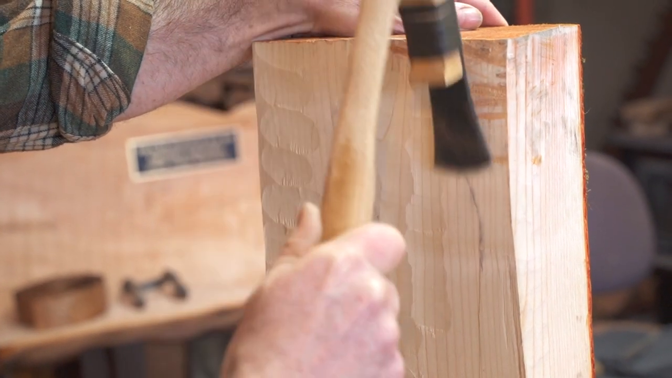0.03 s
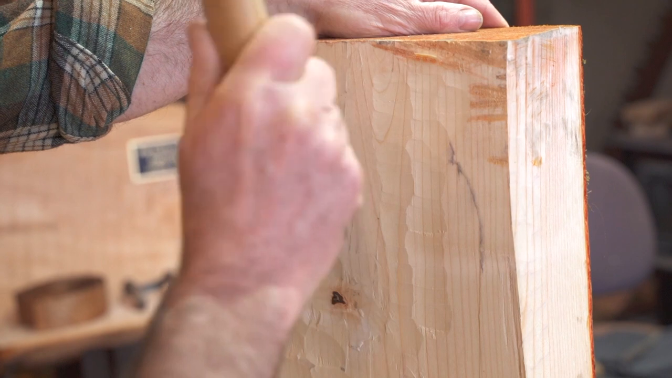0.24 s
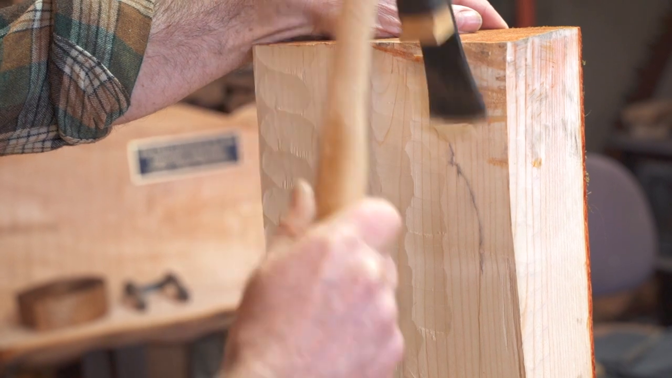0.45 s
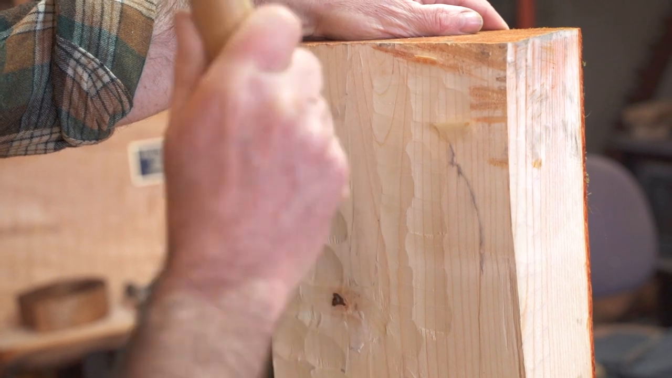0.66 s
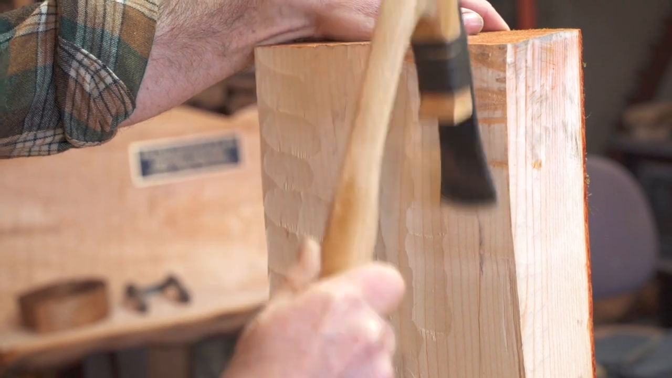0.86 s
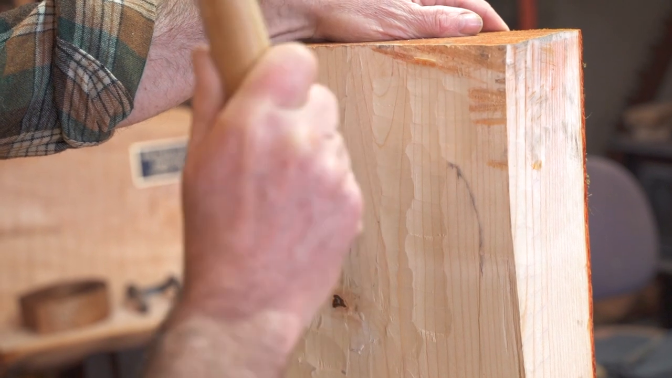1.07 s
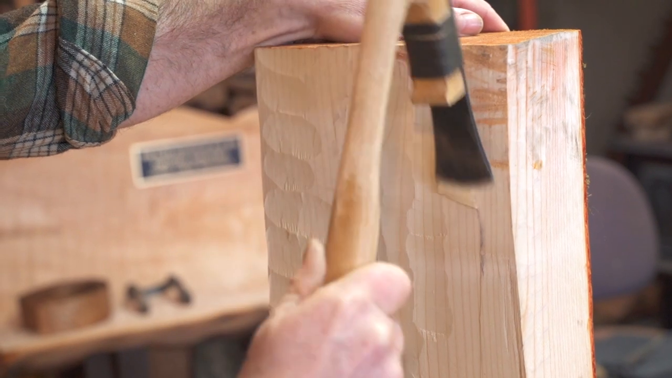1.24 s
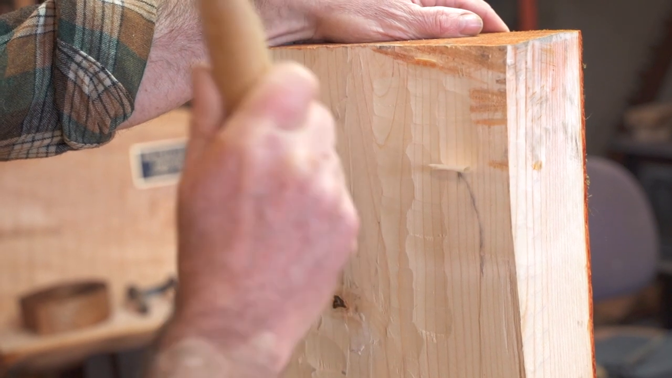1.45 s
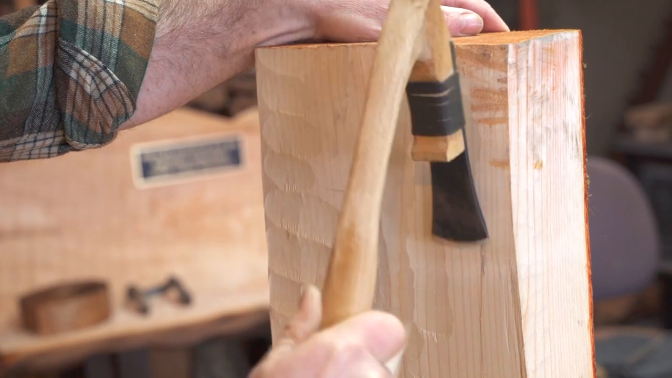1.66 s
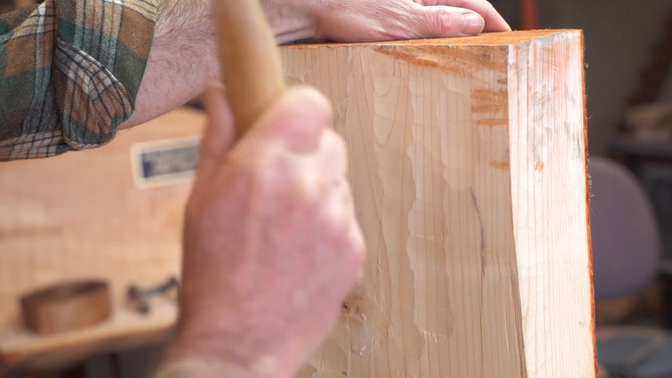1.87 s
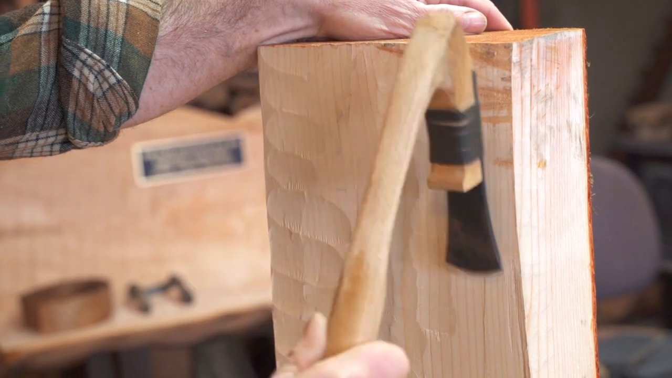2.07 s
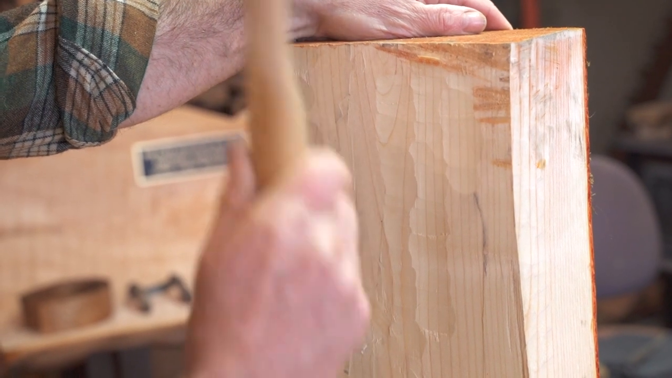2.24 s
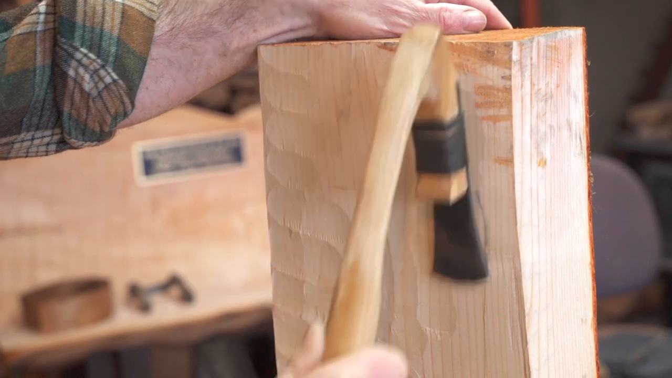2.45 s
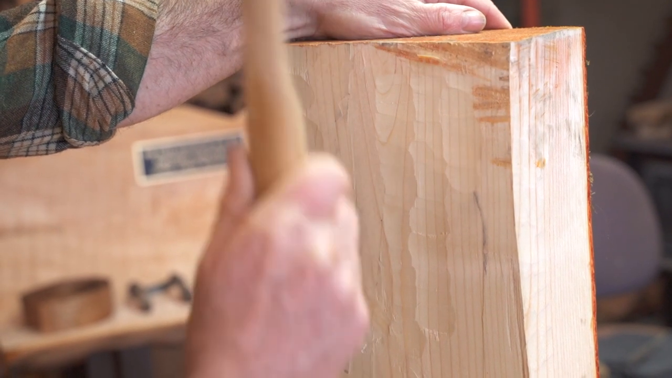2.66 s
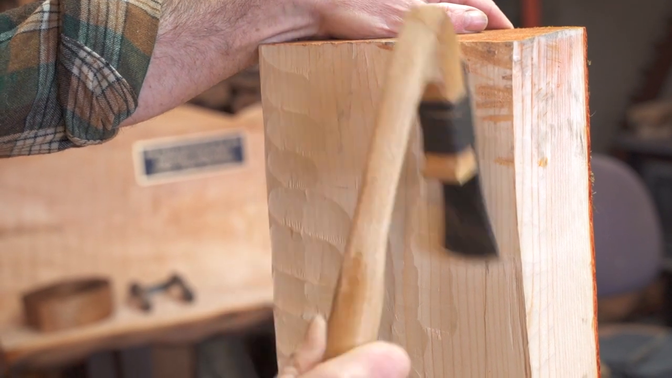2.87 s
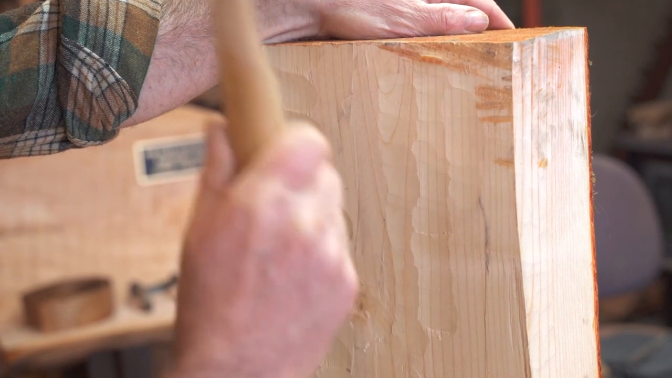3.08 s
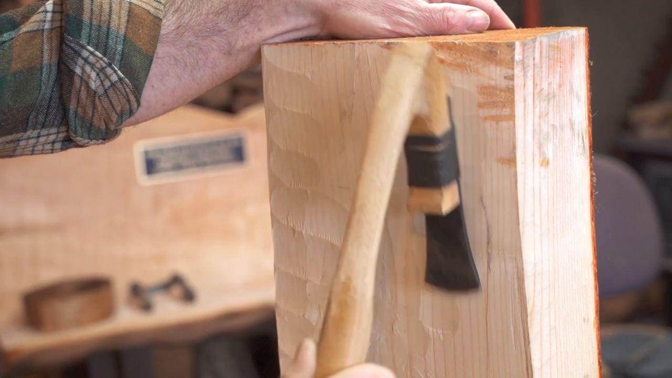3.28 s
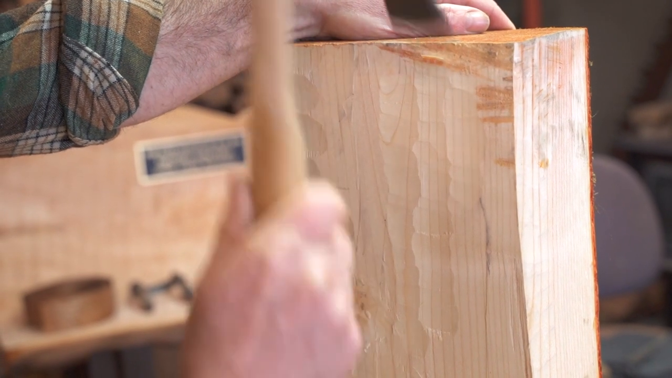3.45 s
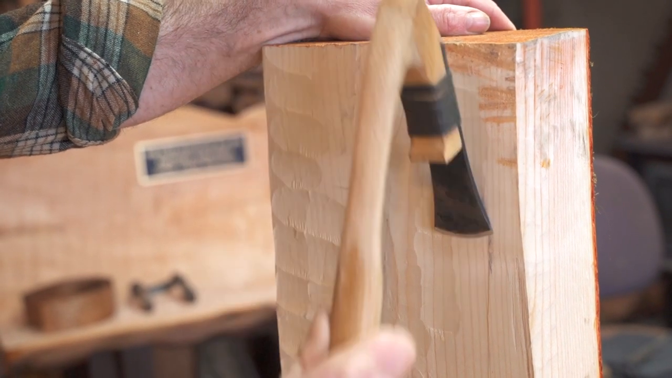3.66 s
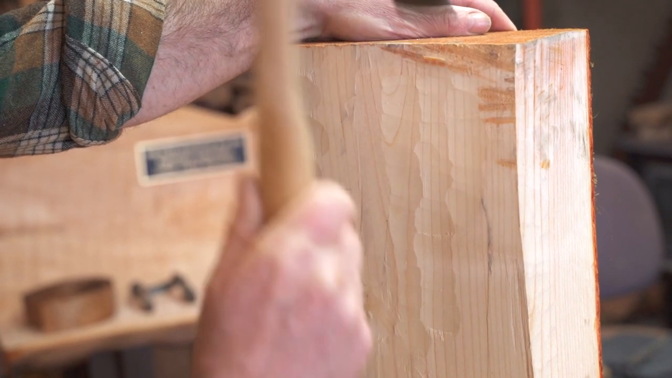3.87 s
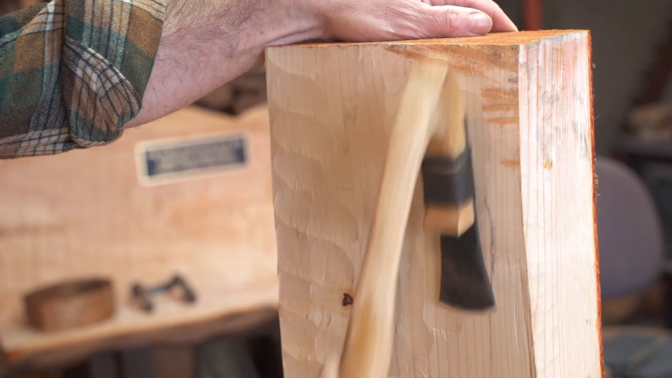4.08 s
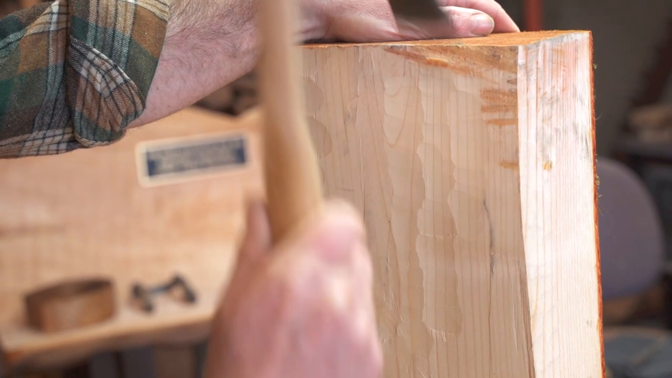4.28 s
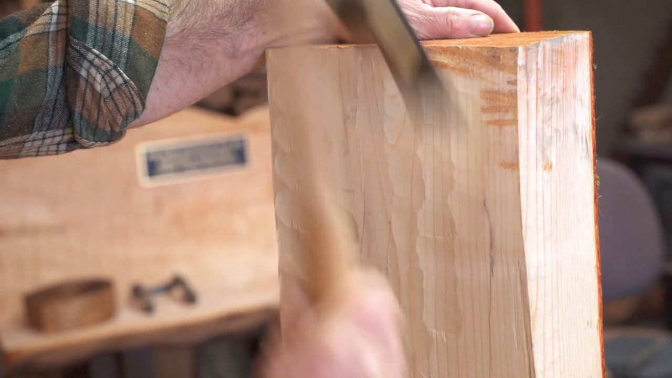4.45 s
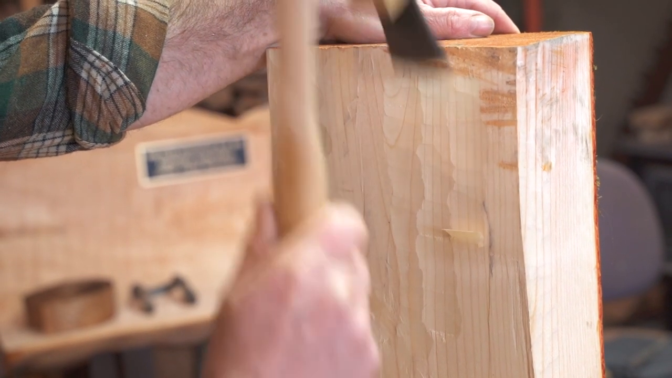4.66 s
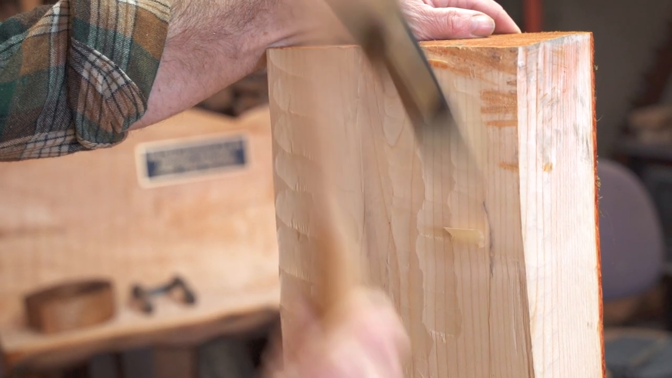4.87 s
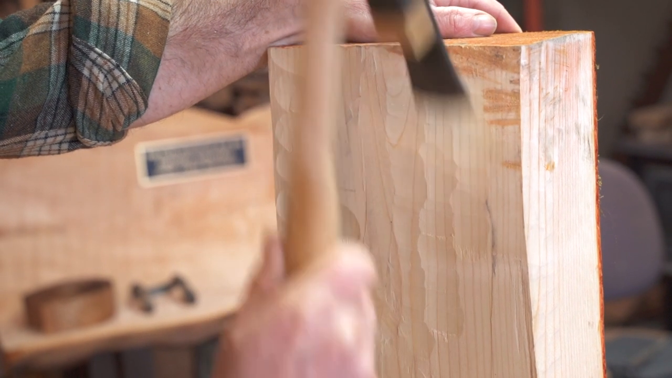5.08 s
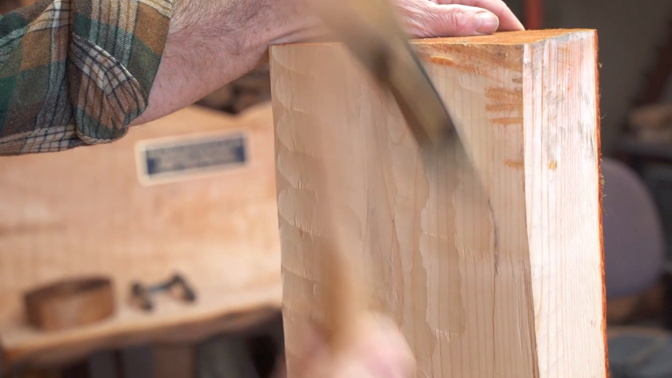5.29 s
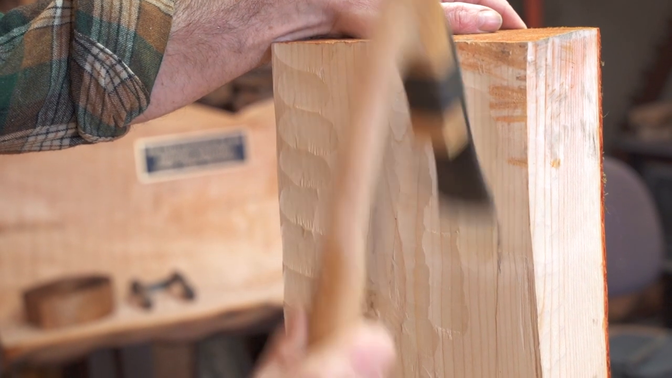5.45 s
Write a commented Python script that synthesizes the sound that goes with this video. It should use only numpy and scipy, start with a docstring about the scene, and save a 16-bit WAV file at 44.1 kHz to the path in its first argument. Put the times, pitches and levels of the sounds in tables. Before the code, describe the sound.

Close single microphone in a small workshop: a hand adze strikes a solid wood block at an even pace, roughly every 0.4 seconds. Each blow is a loud, dry, slightly flattened woody crack with a low bench thump, then quieter dull knocks as the block rocks and settles. Occasional tiny chips tick. The room answers briefly, over a soft low rumble.

```python
"""Adze chopping a wood block

A hand adze cuts a block of wood in even strokes, close to a microphone whose input flattens the peaks.
Each cut sums damped modes of block and bench with a noise burst of tearing fibres. Between cuts the
block rocks with dull modal knocks, and chips tick as short tones plus noise. Decaying filtered noise
gives the small workshop's answer; low coloured noise fills the background.
"""
import sys
import numpy as np
from scipy import signal
from scipy.fft import rfft, irfft, next_fast_len
from scipy.io import wavfile
from scipy.ndimage import map_coordinates

SR = 44100
rng = np.random.default_rng(int(sys.argv[2]) if len(sys.argv) > 2 else 0)


def transcribe(u):
    """Save the signal u as a 16-bit wav file named by the first command-line argument.

    u: samples, shape (n,) or (channels, n), limited to [-1, 1]; the rate is SR.
    q: integer samples, one column per channel.
    """
    v = np.clip(np.atleast_2d(u).T, -1, 1)
    q = np.round(v * 32767).astype(np.int16)
    wavfile.write(sys.argv[1], SR, q)


N = 243538


def amp(db):
    """Decibels to gain."""
    return 10 ** (np.asarray(db) / 20)


def unit(x):
    """Scale to rms 1."""
    return x / np.sqrt(np.mean(x ** 2) + 1e-20)


def along(points, hz):
    """Read (f/Hz, value) points on a log frequency axis."""
    f, value = np.transpose(points)
    return np.interp(np.log(hz + 1), np.log(f + 1), value)


def noise(spectrum, size):
    """Coloured noise of rms 1; only the shape of the spectrum counts."""
    hz = np.fft.rfftfreq(size, 1 / SR)
    white = rng.standard_normal(size)
    return unit(irfft(rfft(white) * amp(along(spectrum, hz)), size))


def fade(t, t60_s):
    """Exponential decay by 60 dB in t60_s."""
    return np.exp(-np.log(1000) * t / t60_s)


def ring(modes, t, stretch=1):
    """Damped modes; strengths and pitches depend a little on where the blow lands."""
    hz, db, t60_s = np.transpose(modes)[:, :, None]
    hz = hz * stretch * (1 + 0.008 * rng.standard_normal(hz.shape))
    gain = amp(db + rng.standard_normal(db.shape))
    sign = (-1) ** np.arange(len(modes))[:, None]
    return np.sum(sign * gain * fade(t, t60_s) * np.sin(2 * np.pi * hz * t), axis=0)


def add(track, start_s, sound):
    """Mix a sound in at start_s, trimmed to the track."""
    start = round(start_s * SR)
    sound = sound[max(-start, 0):max(N - start, 0)]
    track[max(start, 0):][:len(sound)] += sound


# workshop decay: f/Hz, t60/s
SHOP_DECAY = [(150, 0.33), (600, .25), (1500, 0.19), (4000, 0.2), (8000, 0.15), (15000, 0.16)]
# strength returned by the walls: f/Hz, relative level/dB
WALL_RETURN = [(100, -5), (400, -4.5), (900, 0), (1450, -2.5), (2200, -6), (3500, -11), (6000, -5),
               (10000, -5), (15000, -6.5)]


def shop_answer(x, build_s=0.0082):
    """Workshop reverberation: noise decaying per band, building up as the walls are reached."""
    hz, t, bands = signal.stft(rng.standard_normal(SR // 3), SR, nperseg=256)
    decay = fade(t, along(SHOP_DECAY, hz)[:, None])
    bands = bands * decay * amp(along(WALL_RETURN, hz))[:, None]
    tail = signal.istft(bands, SR, nperseg=256)[1]
    tail_t = np.arange(len(tail)) / SR
    tail = tail * (1 - np.exp(-(tail_t / build_s) ** 2))
    return signal.fftconvolve(x, tail / np.linalg.norm(tail))[:len(x)]


def in_shop(x, wet_db):
    """A sound plus the workshop's answer."""
    return x + amp(wet_db) * shop_answer(x)


# block modes, in three groups (thud, ring and bite): f/Hz, relative level/dB, t60/s
THUD_MODES = [(227.6, -17.5, 0.18), (334.4, -0.5, .04), (462, 0.5, 0.051), (610.5, 3.5, 0.026)]
RING_MODES = [(1419.3, -2.5, 0.035), (1692, -3, 0.023), (1374, -25.5, 0.093), (1537, -9, 0.046)]
BITE_MODES = [(2064, -4, 0.02), (2197, -5, 0.038), (2400, 4, 0.012), (2515, -2.5, 0.017),
              (3070, -0.5, .015), (3427, 2, 0.011), (3880, -4, 0.022), (4270, -11.5, 0.029),
              (4940, -17, 0.0033), (2144, -24.5, 0.18)]
# tearing fibres, noise density: f/Hz, relative level/dB
TEAR_SPECTRUM = [(200, 2), (600, 2), (800, -12), (1100, -13), (1500, -1), (3500, 1.5), (6000, -5.5),
                 (9000, -11), (15000, -13)]


def crack(t, thud_db, ring_db, bite_db, tear_db, ring_hz, tearing_s):
    """One cut as it radiates in one direction: block modes plus noise of tearing fibres."""
    thud = amp(thud_db - 1) * ring(THUD_MODES, t)
    wood = amp(ring_db) * ring(RING_MODES, t, stretch=ring_hz / RING_MODES[0][0])
    bite = amp(bite_db + 6) * ring(BITE_MODES, t)
    # fibres part while the edge moves, then the crackle dies quickly
    travel = fade(np.maximum(t - tearing_s, 0), 0.016)
    fibres = amp(tear_db + 10) * travel * noise(TEAR_SPECTRUM, len(t))
    return thud + wood + bite + fibres


# bench modes: f/Hz, relative level/dB, t60/s
BENCH_MODES = [(13.8, -19.5, 0.39), (26.6, -16, 0.13), (58, -34, 0.22), (78, -32, 0.24), (112.8, -19.5, .2),
               (149, -35.5, 0.12)]
# cuts, levels relative within each column: t/s, thud level/dB, ring level/dB, bite level/dB,
# tearing level/dB, main ring f/Hz, tearing time/s, bench shake level/dB, rocking level/dB, drop delay/s
CUTS = [(-.0098, -7.5, -7.5, -12, -27, 1422, 0.0062, 2, -28.5, .2),
        (0.3981, -9, 2, -14, -16.5, 1397, 0.0021, 5.5, -32, 0.19),
        (0.8171, -16.5, -2, -10.5, -8, 1383, 0.0017, 2.5, -29, 0.19),
        (1.2284, -14, -3.5, -13, -11, 1392, 0.002, 3, -39, 0.17),
        (1.6463, -13.5, -5.5, -13, -17.5, 1421, 0.0027, 6, -28.5, 0.2),
        (2.0569, -13.5, -4.5, -9.5, -16.5, 1465, 0.0032, 5, -30, 0.19),
        (2.4617, -9.5, -5, -11.5, -22.5, 1396, 0.0071, 2.5, -31.5, 0.19),
        (2.8637, -11.5, -7.5, -19, -22.5, 1399, 0.0027, 4.5, -35, 0.18),
        (3.2751, -8.5, -2.5, -10.5, -21.5, 1415, 0.0064, 4.5, -28, 0.19),
        (3.6863, -9.5, -9, -28, -26.5, 1385, 0.005, 3, -30, .197),
        (4.0977, -10.5, -4.5, -10, -19, 1406, 0.003, 0.5, -32, .185),
        (4.5185, -11.5, -6, -10.5, -20, 1417, .0027, 5.5, -41, 0.16),
        (4.9292, -11, -3.5, -6, -13, 1424, 0.0051, 3.5, -30.5, 0.19),
        (5.3456, -13.5, -6.5, -9, -13, 1377, 0.003, 6, -34.5, 0.21)]


def cuts(wall_count=4, wet_db=-16.5):
    """Each cut cracks towards the microphone, differently towards each wall, and shoves the bench."""
    out = np.zeros(N)
    t = np.arange(SR // 3) / SR
    for cut_s, *stroke, shake_db, _, _ in CUTS:
        walls = sum(shop_answer(crack(t, *stroke)) for _ in range(wall_count)) / np.sqrt(wall_count)
        add(out, cut_s, crack(t, *stroke) + amp(wet_db) * walls)
        # the heavy bench is pushed away and takes a moment to get moving
        shake = -ring(BENCH_MODES, t) * (1 - np.exp(-t / 0.025))
        add(out, cut_s + 0.0013, amp(shake_db) * shake)
    return out


# room noise density: f/Hz, relative level/dB
FLOOR_SPECTRUM = [(12, 15), (25, 4), (50, 1.5), (120, -3.5), (190, -15.5), (270, -11.5), (390, -14.5),
                  (470, -14.5), (760, -26.5), (1300, -27), (2000, -38), (4000, -45.5), (12000, -45),
                  (16000, -51)]


def background(level_db=-41.5, waver_db=-1.0, knots_per_s=3):
    """Low room noise whose level wavers slightly along a random spline."""
    knots = rng.standard_normal(knots_per_s * N // SR + 2)
    waver = map_coordinates(knots, [np.arange(N) * knots_per_s / SR])
    return amp(level_db + waver_db * waver) * noise(FLOOR_SPECTRUM, N)


RATTLE_GAP_S, RATTLE_DB, RATTLE_FALL_DB_PER_S = 0.027, -3.5, 58.5  # mean gap; level re rocking


def rattle(cut_s, db, count=13, scatter_db=5.0):
    """Loose contacts at uneven gaps, dying away as the block comes to rest: rows (t/s, level/dB)."""
    delay_s = RATTLE_GAP_S * (1 + np.arange(count) + rng.random(count))
    fall_db = RATTLE_FALL_DB_PER_S * delay_s
    level_db = db + RATTLE_DB - fall_db + scatter_db * rng.standard_normal(count)
    return list(zip(cut_s + delay_s, level_db))


CHATTER_S = 0.013  # mean gap between contacts of one landing


def chatter(land_s, db, loss_db, count=3):
    """One landing as unevenly timed contacts, each weaker than the last: rows (t/s, level/dB)."""
    k = np.arange(count)
    jitter = (k > 0) * rng.uniform(-0.3, 0.3, count)
    times_s = land_s + CHATTER_S * (k + jitter)
    return list(zip(times_s, db - loss_db * k))


# levels re the cut's rocking level; tip delay from the cut, settle delay from the drop
TIP_S, TIP_DB = 0.137, -1
DROP_DB = 3
SETTLE_S, SETTLE_DB = 0.122, -7.5


def rocking(cut_s, db, drop_s):
    """Contacts after one cut: the block tips onto one edge, drops back and settles, with rattle."""
    tip = chatter(cut_s + TIP_S, db + TIP_DB, loss_db=2.0)
    drop = chatter(cut_s + drop_s, db + DROP_DB, loss_db=5)
    settle = [(cut_s + drop_s + SETTLE_S, db + SETTLE_DB)]
    return tip + drop + settle + rattle(cut_s, db)


# block-on-bench modes: f/Hz, relative level/dB, t60/s
ROCK_MODES = [(248, -3.5, 0.073), (302, -19.5, 0.21), (451.3, 1, 0.1), (610, -7.5, 0.03)]
# block slips and bumps hard on the bench: t/s, level/dB, third-mode f/Hz
BUMPS = [(.415, -12, 506), (.432, -15.5, 424), (4.57, -23, 480.4)]


def knocks(pitch_scatter=0.025):
    """The block meets the bench in dull contacts; a soft onset rounds the damped modes."""
    out = np.zeros(N)
    t = np.arange(SR // 5) / SR
    soft_contact = 1 - np.exp(-(t / 0.0015) ** 2)
    for cut_s, *_, rock_db, drop_s in CUTS:
        for contact_s, level_db in rocking(cut_s, rock_db, drop_s):
            knock = ring(ROCK_MODES, t, stretch=1 + pitch_scatter * rng.standard_normal())
            add(out, contact_s, amp(level_db) * knock * soft_contact)
    for bump_s, level_db, hz in BUMPS:
        bump = ring(ROCK_MODES, t, stretch=hz / ROCK_MODES[2][0])
        add(out, bump_s, amp(level_db) * bump * soft_contact)
    return in_shop(out, wet_db=-17.5)


# chip noise density: f/Hz, relative level/dB
CHIP_BODY = [(300, -13), (900, -1), (1900, -1), (2700, -8.5), (4000, -12), (8000, -28.5)]
CHIP_EDGE = [(1000, -36), (3000, -7.5), (6000, 5.5), (11000, 4), (16000, -4)]
# chips snapping off or landing: t/s, body level/dB, edge level/dB (relative), chip tone f/Hz
CHIPS = [(0.0468, -19.5, -62, 1560), (0.0915, -27.5, -31, 1490), (0.9063, -28, -30, 1650),
         (0.9266, -31.5, -43, 3130), (1.0133, -57.5, -54.5, 3010), (1.2645, -22.5, -20.5, 5450),
         (1.7477, -36.5, -45, 2290), (2.1411, -47, -46.5, 3000), (2.2735, -45.5, -62, 2250),
         (2.9795, -29.5, -41, 2040), (3.7844, -33, -37, 2660), (4.2784, -39.5, -51.5, 1584),
         (4.5862, -27, -41, 1300), (4.8248, -57.5, -53.5, 4790), (5.4458, -48, -43, 7050)]
CHIP_RING_T60_S, CHIP_BODY_T60_S, CHIP_EDGE_T60_S = 0.011, 0.02, 0.008
CHIP_RUSTLE_DB = -5.5  # body noise, relative to the tone's gain


def chips():
    """Chips snap off and land: a brief tone each, with woody body noise and a bright noise edge."""
    out = np.zeros(N)
    t = np.arange(SR // 4) / SR
    for chip_s, body_db, edge_db, hz in CHIPS:
        tone = np.sin(2 * np.pi * hz * t) * fade(t, CHIP_RING_T60_S)
        rustle = amp(CHIP_RUSTLE_DB) * noise(CHIP_BODY, len(t)) * fade(t, CHIP_BODY_T60_S)
        body = amp(body_db) * (tone + rustle)
        edge = amp(edge_db + 7) * noise(CHIP_EDGE, len(t)) * fade(t, CHIP_EDGE_T60_S)
        add(out, chip_s, in_shop(body, wet_db=-9) + in_shop(edge, wet_db=-13))
    return out


def scene():
    """Everything at the one microphone."""
    return (cuts() + background() + knocks() + chips())[None]


TOP_HZ = 16200


def record(dry, ceiling=0.51, hardness=6):
    """The input saturates towards the ceiling; a steep low-pass then limits the band."""
    clipped = dry / (1 + np.abs(dry / ceiling) ** hardness) ** (1 / hardness)
    size = next_fast_len(N + SR // 4)
    hz = np.fft.rfftfreq(size, 1 / SR)
    low_pass = 1 / (1 + (hz / TOP_HZ) ** 100)
    return irfft(rfft(clipped, size) * low_pass, size)[:, :N]


dry = scene()
out = record(dry)
transcribe(out)
```